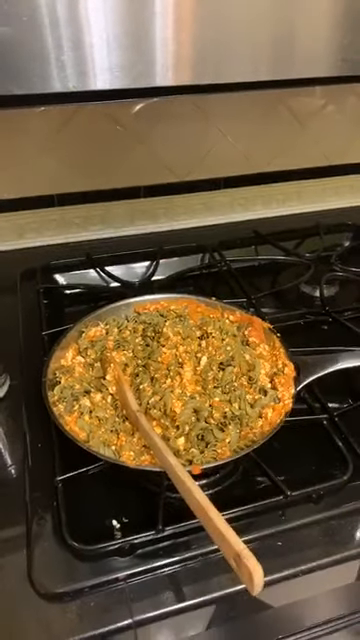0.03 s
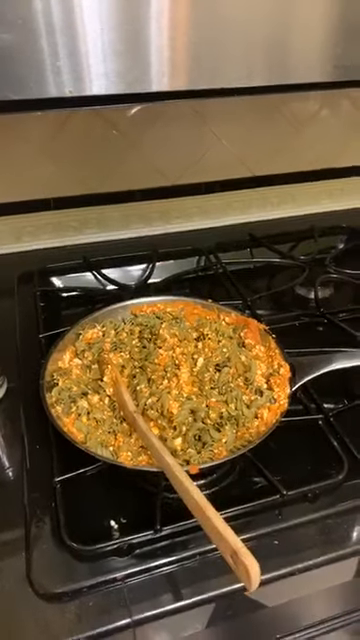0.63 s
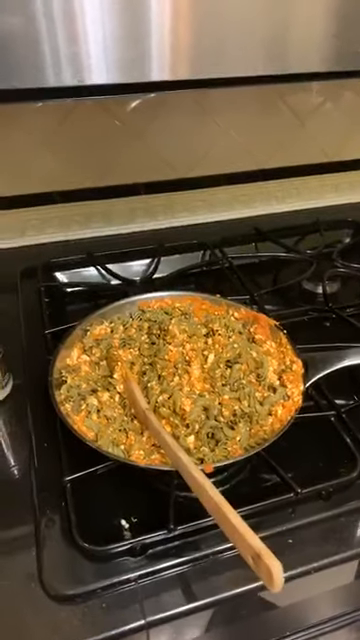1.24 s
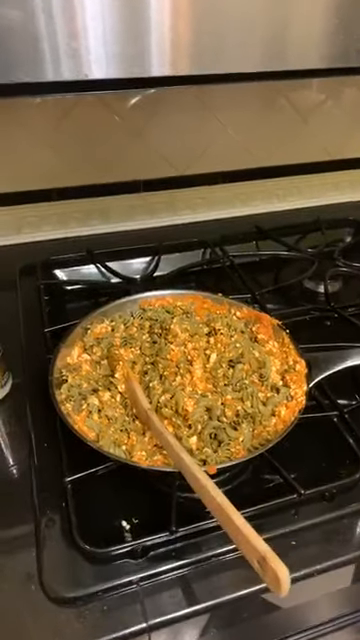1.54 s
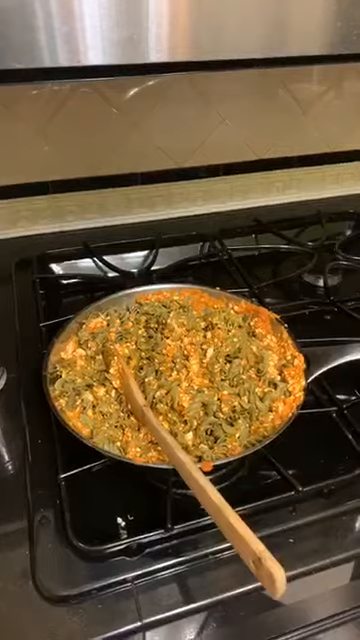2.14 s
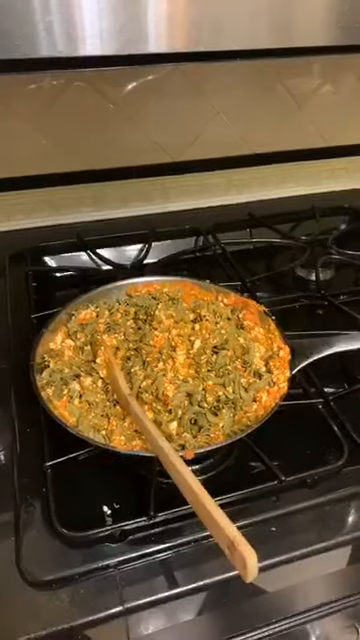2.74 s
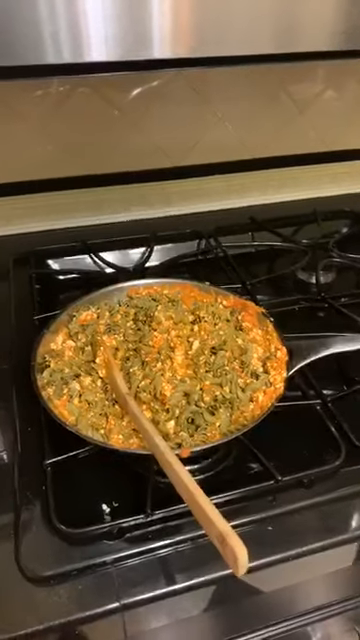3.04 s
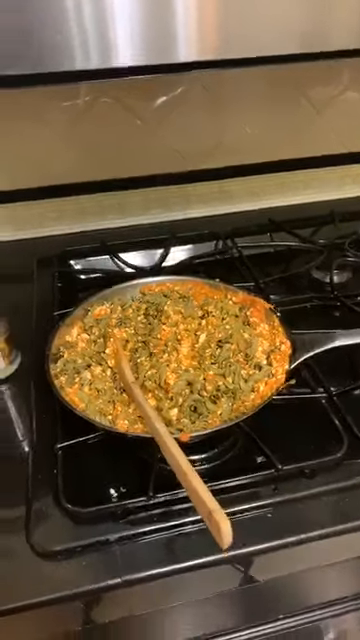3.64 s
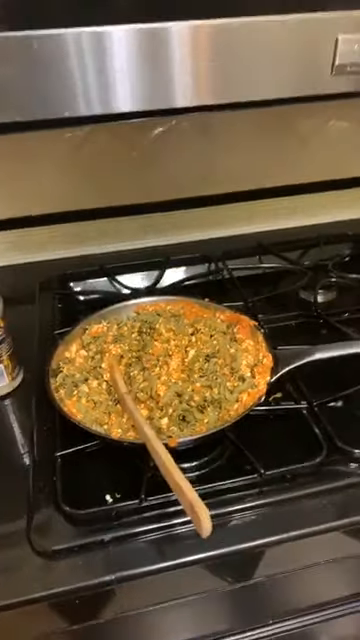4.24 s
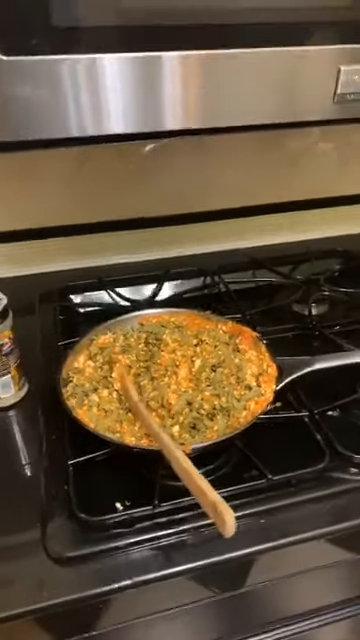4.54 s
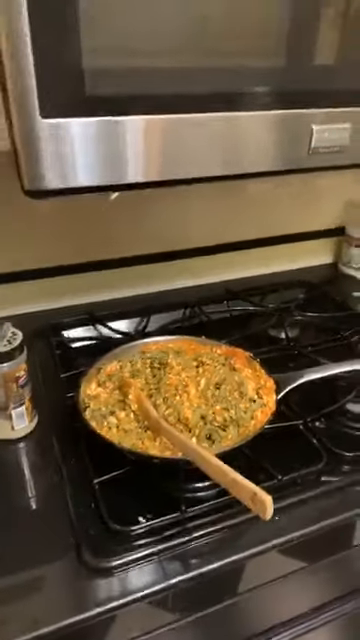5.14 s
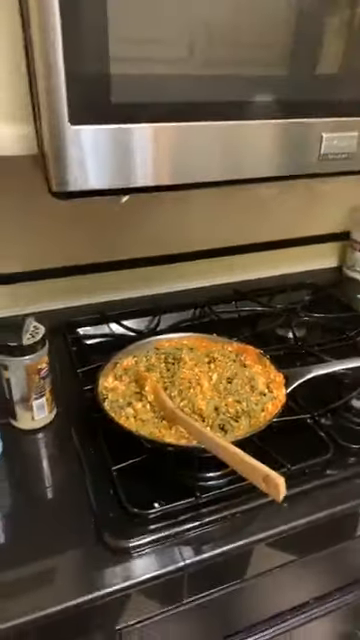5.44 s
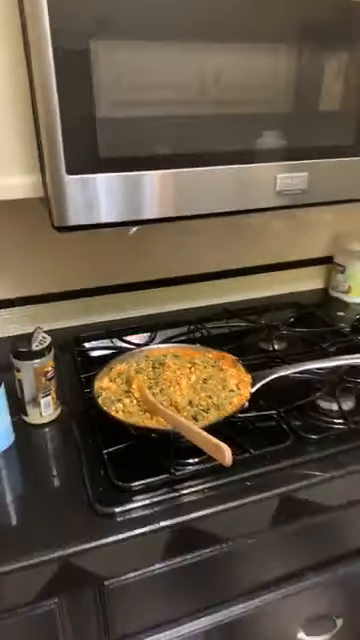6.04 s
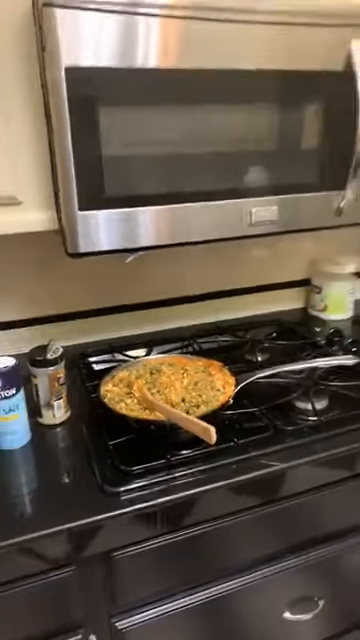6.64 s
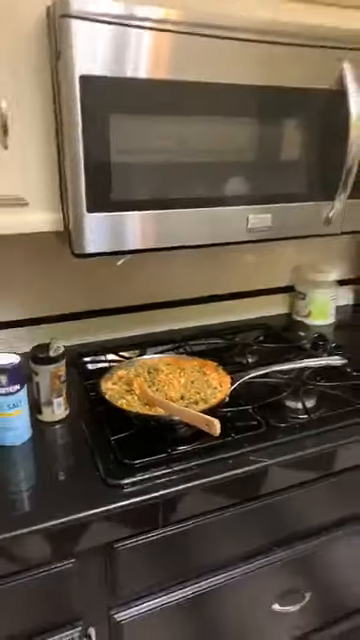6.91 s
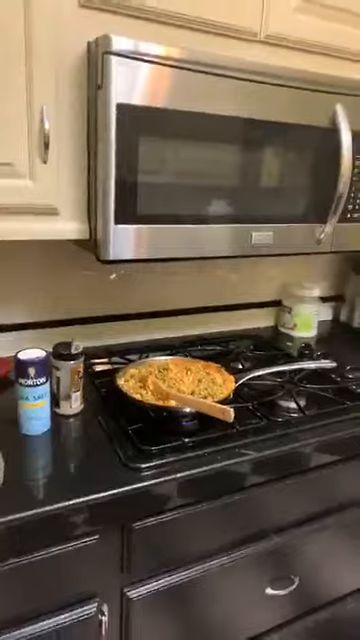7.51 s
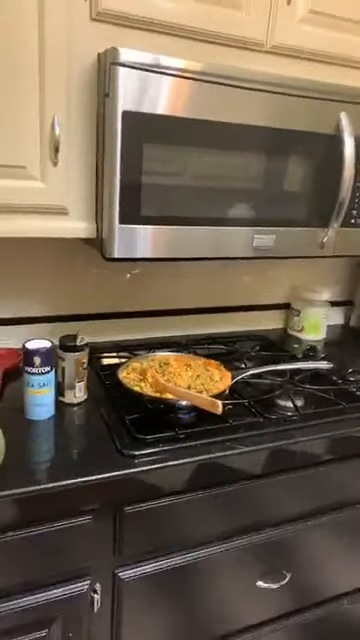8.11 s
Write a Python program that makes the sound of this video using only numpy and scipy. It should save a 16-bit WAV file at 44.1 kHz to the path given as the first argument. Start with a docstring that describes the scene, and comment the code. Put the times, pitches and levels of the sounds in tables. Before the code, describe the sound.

Over faint appliance hiss, soft distant knocks lead to a loud door bang, then shoes step across a hard floor.

```python
"""Door slam in a hard-walled kitchen

One microphone in a live room, over faint appliance hum and hiss. Dull knocks come from further off,
small clicks from close by. A door bangs into its frame: the panel booms, the latch rings, the wall
rumbles. Someone steps back over the hard floor, heel then sole; clothes rustle, thin peeps come and go."""
import sys
import numpy as np
from scipy import signal
from scipy.fft import rfft, irfft, next_fast_len
from scipy.io import wavfile
from scipy.ndimage import map_coordinates

SR = 44100
rng = np.random.default_rng(int(sys.argv[2]) if len(sys.argv) > 2 else 0)


def log_audio(samples):
    """Write samples as a 16-bit WAV file to the path given in sys.argv[1]."""
    # one column per channel
    frames = np.atleast_2d(samples).T
    # limit to full scale, then quantise
    limited = np.clip(frames, -1, 1)
    pcm = np.round(limited * 32767).astype(np.int16)
    wavfile.write(sys.argv[1], SR, pcm)


N = 369116
HIT_SAMPLES = SR


def amp(db):
    """Decibels to gain."""
    return 10 ** (np.asarray(db) / 20)


def unit(x):
    """Scaled to rms 1."""
    return x / np.sqrt(np.mean(x ** 2) + 1e-20)


def along(points, hz):
    """(Hz, value) points read on a log frequency axis."""
    freqs, values = np.transpose(points)
    return np.interp(np.log(hz + 1e-3), np.log(freqs), values)


def noise(spectrum):
    """Steady coloured noise of rms 1."""
    size = next_fast_len(N)
    gain = amp(along(spectrum, np.fft.rfftfreq(size, 1 / SR)))
    return unit(irfft(rfft(rng.standard_normal(size)) * gain)[:N])


def wobble(rate):
    """A smooth random curve, rate knots a second."""
    knots = rng.standard_normal(int(N * rate / SR) + 4)
    return map_coordinates(knots, [np.arange(N) * rate / SR])


def add(track, s, sound):
    """Mix a sound into the track at time s."""
    part = track[round(s * SR):][:len(sound)]
    part += sound[:len(part)]


def hit_axes():
    """Times and frequencies of one hit."""
    return np.arange(HIT_SAMPLES) / SR, np.fft.rfftfreq(HIT_SAMPLES, 1 / SR)


def coloured(hit, gain):
    """A hit through a minimum-phase filter, its gain scaled to rms 1."""
    cepstrum = irfft(np.log(np.maximum(unit(gain), 1e-6)), HIT_SAMPLES)
    cepstrum[1:HIT_SAMPLES // 2] *= 2
    cepstrum[HIT_SAMPLES // 2 + 1:] = 0
    return irfft(rfft(hit) * np.exp(rfft(cepstrum)), HIT_SAMPLES)


def resonance(hz, centre, sharpness):
    """Gain of one damped resonance, 1 at its centre."""
    return 1 / np.hypot(1, sharpness * (hz / centre - centre / (hz + 1)))


def dense_modes(spacing_hz, depth_db):
    """The many small resonances of a solid body, as a random ripple in dB over frequency."""
    _, hz = hit_axes()
    knots = rng.standard_normal(HIT_SAMPLES // 8)
    return depth_db * map_coordinates(knots, [hz / spacing_hz], mode="mirror")


# Broad hiss filling the kitchen: (frequency [Hz], relative level [dB])
AIR_SPECTRUM = [(15, -38), (25, -6), (55, 1), (91, -7.5), (222, -9.5), (261, -11.5), (435, -12),
                (766, -20.5), (1630, -14), (2190, -7), (3960, -25), (5050, -24), (9130, -37),
                (11000, -34.5), (15600, -57)]
# The appliances' narrow hiss: (frequency [Hz], relative level [dB])
HISS_SPECTRUM = [(1000, -22), (1650, -19.5), (1950, -0.5), (2250, -0.5), (2500, -29), (2800, -3.5),
                 (3300, -13.5), (4000, -9.5), (4600, -37.5)]
# Mains hum: (frequency [Hz], level [dB])
MAINS_LINES = [(60, -71.5), (120, -85.5)]

def room_tone():
    """Appliances hiss and hum; the narrow hiss wavers, flutters and fades as the microphone backs away."""
    t = np.arange(N) / SR
    back_away_s, fade_db_per_s = 6.1, 3.5
    fade_db = fade_db_per_s * np.maximum(t - back_away_s, 0)
    hiss_db = -59.5 - fade_db + 0.5 * wobble(rate=3.23) + 2 * wobble(rate=41)
    hiss = amp(-58.5) * noise(AIR_SPECTRUM) + amp(hiss_db) * noise(HISS_SPECTRUM)
    hum = sum(amp(db) * np.sin(2 * np.pi * (hz * t + rng.random())) for hz, db in MAINS_LINES)
    return hiss + np.sqrt(2) * hum


# Rubbing cloth: (frequency [Hz], relative level [dB])
CLOTH_SPECTRUM = [(500, 4), (3500, 4.5), (7500, -4.5), (9300, -10.5), (11500, -5.5), (15500, -18.5)]
# Swishes at the microphone: (peak time [s], level [dB], half length [s])
CLOTH_SWISHES = [(3.453, -66, 0.068), (3.795, -61, .06), (5.128, -51, 0.16), (5.483, -66, 0.17),
                 (7.454, -61, 0.1), (7.754, -55.5, 0.066), (8.14, -57, 0.063)]

def clothes():
    """A faint rustle that grows once the wearer moves, with a swish at each larger gesture."""
    t = np.arange(N) / SR
    move_s, rest_s, ease_s = 4.22, 8.5, 0.3
    still_db, moving_db = -70, -60.5
    moving = (np.tanh((t - move_s) / ease_s) - np.tanh((t - rest_s) / ease_s)) / 2
    rustle = amp(still_db + (moving_db - still_db) * moving)
    swish_power = sum(amp(db) ** 2 * np.exp(-((t - s) / half) ** 2) for s, db, half in CLOTH_SWISHES)
    return np.sqrt(rustle ** 2 + swish_power) * amp(0.44 * wobble(rate=5.4)) * noise(CLOTH_SPECTRUM)


# Faint high peeps: (time [s], length [s], level [dB], pitch [Hz], glide [Hz/s], jitter [Hz])
THIN_PEEPS = [(0.816, 0.26, -75, 9000, 5000, 110), (3.383, 0.14, -70, 11000, 0, 500),
              (5.042, 0.15, -61.5, 10300, 0, 300), (5.8, 0.12, -62, 10400, 0, 260),
              (8.073, 0.085, -59, 12500, -7000, 550)]

def peeps():
    """Unsteady little whistles, perhaps steam from a hot pan, that swell, glide and die."""
    out = np.zeros(N)
    for s, length, db, pitch_hz, glide, jitter_hz in THIN_PEEPS:
        t = np.arange(round(length * SR)) / SR
        hz = pitch_hz + glide * t + jitter_hz * wobble(rate=1100)[:len(t)]
        swell = np.sin(np.pi * t / length)
        add(out, s, amp(db) * swell * np.sin(2 * np.pi * np.cumsum(hz) / SR))
    return out


# Reverberation between the hard walls: (frequency [Hz], t60 [s])
KITCHEN_DECAY = [(60, 0.86), (200, 0.9), (500, 0.91), (2000, 1.08), (5000, 0.98), (8000, 0.95),
                 (12000, 0.54)]

def contact(rise_s, t60_s, room_db, decay_scale=1, snap=0):
    """A hard snap, a burst of tiny collisions and the room's answer, with the energy of 50 ms at rms 1."""
    t, _ = hit_axes()
    force = (1 - np.exp(-t / rise_s)) * amp(-60 * t / t60_s)
    hz, age, bands = signal.stft(rng.standard_normal(HIT_SAMPLES), SR, nperseg=256)
    room_t60_s = decay_scale * along(KITCHEN_DECAY, hz)[:, None]
    tail = signal.istft(bands * amp(-60 * age / room_t60_s), SR, nperseg=256)[1][:HIT_SAMPLES]
    filling = np.sqrt(np.cumsum(force ** 2)) * (1 - np.exp(-t / 0.0061))  # the contact feeds the room
    direct = snap * unit(1. * (t == 0)) + unit(force * rng.standard_normal(HIT_SAMPLES))
    at_mic = direct + amp(room_db) * unit(filling * tail)
    return at_mic / np.linalg.norm(at_mic) * np.sqrt(SR / 20)


# A knock's hollow thud: (frequency [multiple of the pitch], relative level [dB])
THUD_SPECTRUM = [(.25, -33), (.5, -13.5), (.7, -6), (1, -1), (1.45, -9.5), (2, -20.5), (5, -76)]
# The rattle on top: (frequency [Hz], relative level [dB])
RATTLE_SPECTRUM = [(100, -35), (700, 3), (1500, 8.5), (3000, 2), (6000, -16.5), (14000, -51)]
# Knocks further off in the room: (time [s], level [dB], thud pitch [Hz])
FAR_KNOCKS = [(1.801, -61.5, 437), (1.89, -54.5, 452), (2.332, -44.5, 454), (2.360, -45, 340),
              (2.81, -57, 465), (3.703, -50.5, 496), (4.323, -49, 495), (5.368, -43, 484)]

def knocks():
    """Soft, heavy blows: a hollow thud and a little rattle, which grows more slowly with force."""
    out, (_, hz) = np.zeros(N), hit_axes()
    firm_db, rattle_growth = -43.5, 0.52  # a firm knock; dB of rattle per dB of force
    rattle = unit(amp(along(RATTLE_SPECTRUM, hz)))
    for s, db, pitch_hz in FAR_KNOCKS:
        thud = unit(amp(along(THUD_SPECTRUM, hz / pitch_hz)))
        rattle_db = -7.5 + (rattle_growth - 1) * (db - firm_db)
        colour = (thud + amp(rattle_db) * rattle) * amp(dense_modes(spacing_hz=30, depth_db=1.5))
        blow = contact(rise_s=0.0022, t60_s=0.05, room_db=5.5, decay_scale=0.73, snap=0.3)
        add(out, s, amp(db) * coloured(blow, colour))
    add(out, 2.336, amp(-39.5) * boom(attack_s=0.012))  # one heavy knock also shakes the floor
    return out


# Wooden panel, for floor and door alike: (frequency [Hz], relative level [dB], t60 [s])
PANEL_MODES = [(43.2, -3, 0.43), (54, -15, 0.66), (63.05, -13, 0.91), (110, -10, 0.47), (119, -18.5, 0.26),
               (194.3, -8.5, 0.26), (219.4, -15.5, 0.52)]

def boom(attack_s):
    """The low modes of a wooden panel, held up by the room."""
    t, _ = hit_axes()
    modes = sum(amp(db - 60 * t / t60) * np.sin(2 * np.pi * hz * t) for hz, db, t60 in PANEL_MODES)
    return modes * (1 - np.exp(-t / attack_s))


# A shoe on the hard floor: (frequency [Hz], relative level [dB])
SHOE_SPECTRUM = [(60, -19.5), (200, -3.5), (380, -2), (550, 3), (800, -1), (1400, 2), (1750, -1), (2100, 4),
                 (2600, -6.5), (3800, 0.5), (4600, -10), (7000, -13), (9500, -21), (12000, -20.5),
                 (15500, -41)]

def shoe_colour(pitch_hz, db_per_octave, clack_db):
    """Gain over frequency of a shoe with one clack resonance; each spot of floor rings differently."""
    _, hz = hit_axes()
    tilt = db_per_octave * np.log2(np.maximum(hz, 200) / 1500)
    clack = clack_db * resonance(hz, pitch_hz, sharpness=10.7)
    return amp(along(SHOE_SPECTRUM, hz) + tilt + clack + dense_modes(spacing_hz=40.06, depth_db=3))


# Soles, more room than direct sound: (time [s], level [dB], clack pitch [Hz], contact t60 [s])
SOLE_SCUFFS = [(3.936, -52, 2120, 0.064), (5.408, -52, 2060, 1), (5.799, -48, 1940, 0.3),
               (5.969, -44.5, 3570, 0.41), (6.111, -51, 1400, .35), (6.30, -43, 1950, 0.34),
               (6.785, -45, 2660, 0.079), (6.951, -54, 3300, 0.036), (7.104, -49.5, 3500, 0.4),
               (7.744, -49, 2180, 0.061)]

def soles():
    """Soles slap down and scuff, brighter than heels; the longer the scuff, the softer its start."""
    out = np.zeros(N)
    for s, db, pitch_hz, t60_s in SOLE_SCUFFS:
        scuff = contact(rise_s=0.056 * t60_s, t60_s=t60_s, room_db=6, decay_scale=0.81)
        add(out, s, amp(db) * coloured(scuff, shoe_colour(pitch_hz, db_per_octave=1.84, clack_db=8)))
    return out


# Clicks near the microphone: (time [s], level [dB], pitch [Hz], room over direct sound [dB])
NEAR_CLICKS = [(3.961, -66, 7300, 4), (4.066, -67, 14000, -5), (4.218, -66.5, 5600, -30),
               (4.314, -74, 7300, -7), (4.37, -62.5, 4900, -6), (6.168, -53.5, 1340, -5),
               (6.795, -57.5, 12100, 7), (7.756, -62, 5850, 1)]

def clicks():
    """Tiny hard contacts, each with one broad resonance."""
    out, (_, hz) = np.zeros(N), hit_axes()
    for s, db, pitch_hz, room_db in NEAR_CLICKS:
        tick = contact(rise_s=0.0005, t60_s=0.009, room_db=room_db, decay_scale=0.48)
        add(out, s, amp(db) * coloured(tick, resonance(hz, pitch_hz, sharpness=6.4)))
    return out


# The wooden frame: (frequency [Hz], relative level [dB])
FRAME_SPECTRUM = [(30, 4.5), (155, -2.5), (230, 5), (300, 0), (750, -3.5), (1150, 0), (1700, 0.5),
                  (2700, -6.5), (3800, -4), (4400, -10), (7000, -15), (9300, -20.5), (12000, -17.5),
                  (14500, -33), (15800, -35)]
# The steel latch: (frequency [Hz], width [Hz], relative level [dB])
LATCH_MODES = [(1870, 230, -1.5), (2030, 160, -9), (2120, 250, 1.5), (2233, 89, -2)]
# The door meets its frame: (time [s], frame level [dB], latch level [dB], rise [s], contact t60 [s])
DOOR_CONTACTS = [(4.562, -27, -61, 0.015, 0.15), (4.585, -26.5, -53, 0.0074, 0.18),
                 (4.6194, -27.5, -20.5, 0.0035, 0.022), (4.637, -28.5, -23.5, 0.0035, 0.024),
                 (4.692, -34, -33, 0.0058, 0.15)]

def frame_and_latch():
    """Each contact of the door cracks on the frame and rings the latch, whose bolt adds a brief tone."""
    out, (t, hz) = np.zeros(N), hit_axes()
    wood = amp(along(FRAME_SPECTRUM, hz) + dense_modes(spacing_hz=16, depth_db=1.5))
    peaks = [amp(db) / (1 + (2 * (hz - centre) / width) ** 2) for centre, width, db in LATCH_MODES]
    steel = np.linalg.norm(peaks, axis=0)
    bolt_hz, bolt_gain_db, bolt_attack_s, bolt_t60_s = 2154, 21.5, 0.0064, 0.029
    bolt_envelope = (1 - np.exp(-t / bolt_attack_s)) ** 2 * amp(bolt_gain_db - 60 * t / bolt_t60_s)
    bolt = bolt_envelope * np.sin(2 * np.pi * bolt_hz * t)
    for s, frame_db, latch_db, rise_s, t60_s in DOOR_CONTACTS:
        crack = coloured(contact(rise_s, t60_s, room_db=4.5), wood)
        ring = coloured(contact(rise_s, t60_s, room_db=-1.5, decay_scale=0.81, snap=0.1), steel)
        add(out, s, amp(frame_db) * crack + amp(latch_db) * (bolt + ring))
    return out


# The wall after the slam: (frequency [Hz], relative level [dB])
WALL_SPECTRUM = [(10, -12), (25, 0), (55, -1), (100, -9), (150, -24), (300, -61)]
# Pushes on the door panel: (time [s], level [dB])
PANEL_PUSHES = [(4.573, -16.5), (4.621, -13), (4.690, -15)]

def panel_and_wall():
    """Each push of the slam sets the door panel booming, and the wall rumbles on."""
    out, (t, _) = np.zeros(N), hit_axes()
    wall_gain_db, wall_attack_s, wall_t60_s = -23, 0.044, 1.44
    envelope = (1 - np.exp(-t / wall_attack_s)) * amp(wall_gain_db - 60 * t / wall_t60_s)
    shudder = noise(WALL_SPECTRUM)
    for s, db in PANEL_PUSHES:
        rumble = envelope * shudder[round(s * SR):][:HIT_SAMPLES]
        add(out, s, amp(db) * (boom(attack_s=0.011) + rumble))
    return out


# Heels stepping back over the floor: (time [s], level [dB], clack pitch [Hz])
HEEL_STRIKES = [(5.762, -46.5, 1300), (6.242, -40.5, 1420), (6.324, -41, 1390), (6.710, -47.5, 1180),
                (7.192, -41.5, 1360), (7.261, -39, 1500), (7.269, -41, 1570), (7.629, -43, 1150),
                (7.821, -50.5, 1630)]

def heels():
    """Every heel lands fast, with the same short contact; the harder, the brighter."""
    out, firm_db = np.zeros(N), -40.5
    for s, db, pitch_hz in HEEL_STRIKES:
        blow = contact(rise_s=0.00056, t60_s=0.062, room_db=4.5, decay_scale=0.54, snap=0.23)
        db_per_octave = -0.2 + 0.14 * (db - firm_db)
        add(out, s, amp(db) * coloured(blow, shoe_colour(pitch_hz, db_per_octave, clack_db=8.5)))
    return out


def scene():
    """Everything in the kitchen at one microphone."""
    door = frame_and_latch() + panel_and_wall()
    return (door + knocks() + heels() + soles() + clicks() + clothes() + peeps() + room_tone())[None]


def record(dry):
    """The recorder keeps nothing above its band limit."""
    size, top_hz = next_fast_len(N + SR), 15750
    passband = np.fft.rfftfreq(size, 1 / SR) < top_hz
    return irfft(rfft(dry, size) * passband, size)[..., :N]


dry = scene()
out = record(dry)
log_audio(out)
```